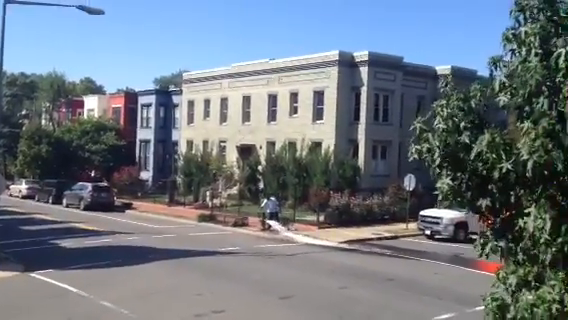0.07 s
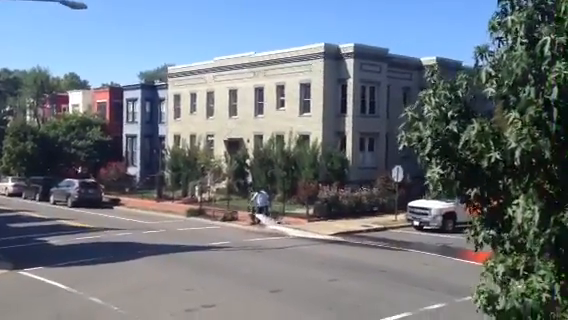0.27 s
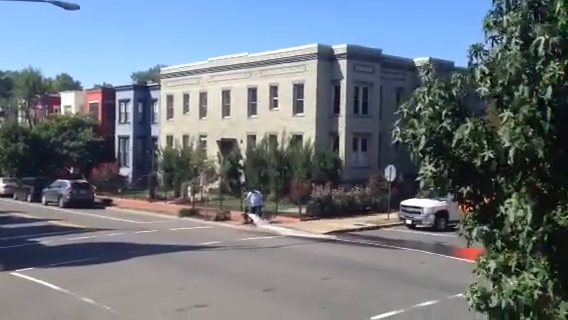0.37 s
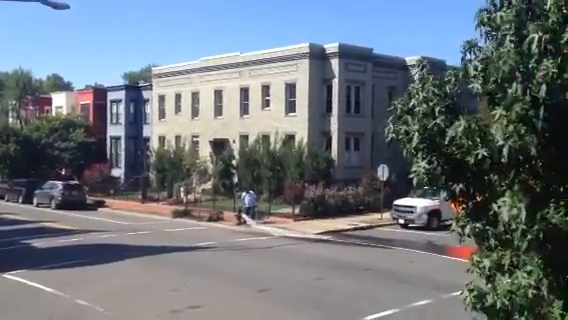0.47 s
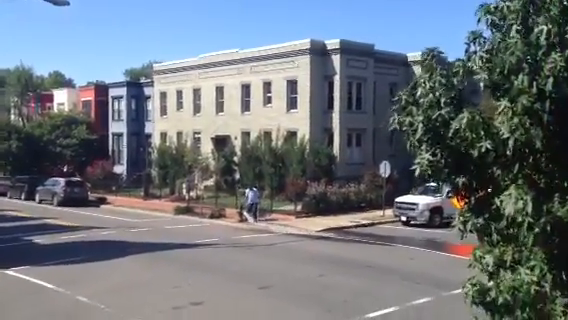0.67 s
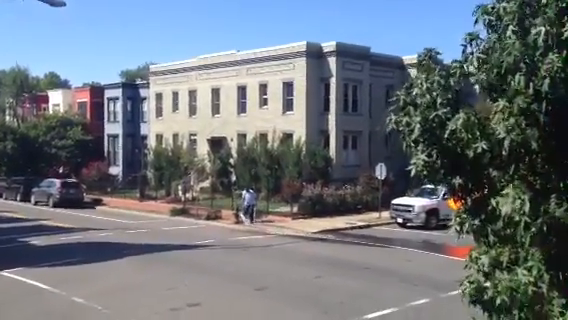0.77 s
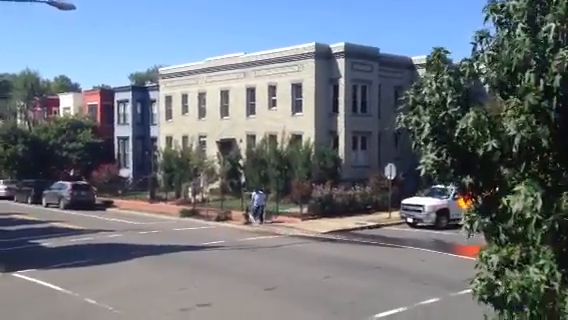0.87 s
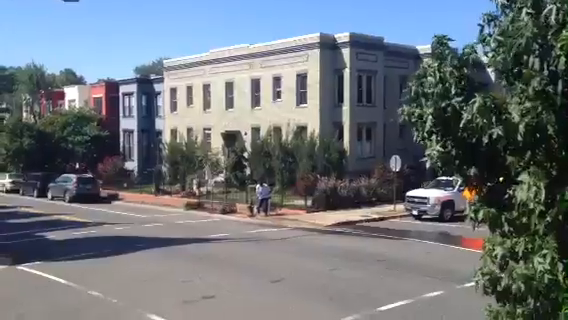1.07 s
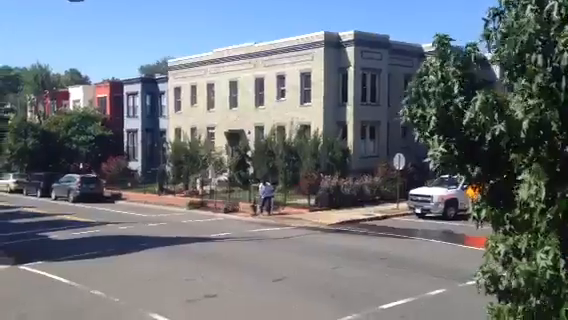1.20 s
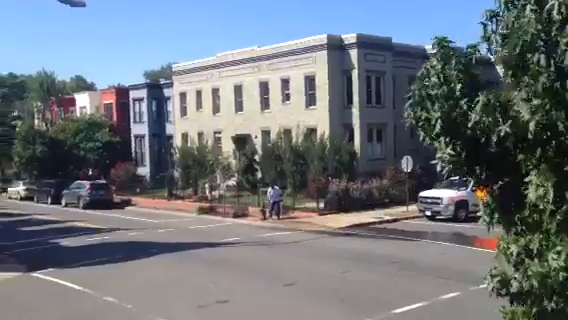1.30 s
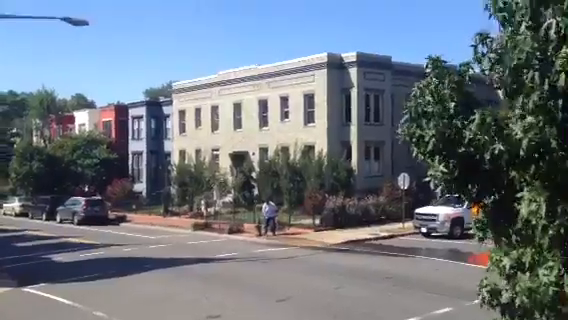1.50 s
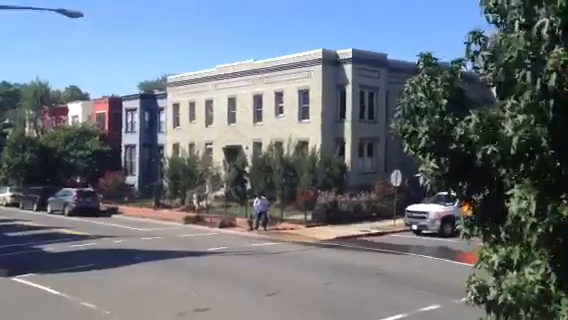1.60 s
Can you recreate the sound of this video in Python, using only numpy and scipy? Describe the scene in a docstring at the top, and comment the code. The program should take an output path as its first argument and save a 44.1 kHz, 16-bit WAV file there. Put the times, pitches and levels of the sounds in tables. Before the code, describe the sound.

Wind buffets the microphone in two gusts over a distant hose's fading hiss.

```python
"""Distant hose in gusty wind

Water gushes from a hose far across a city street: an even hiss that drops back and fades over a
faint traffic wash. Wind buffets the microphone in two gusts: a low flutter, with single eddies
that thump as they cross the port. One brief bright spit of hiss sounds at the microphone."""
import sys
import numpy as np
from scipy.fft import rfft, irfft, next_fast_len
from scipy.io import wavfile
from scipy.ndimage import uniform_filter1d, map_coordinates

SR = 44100
rng = np.random.default_rng(int(sys.argv[2]) if len(sys.argv) > 2 else 0)


def to_wav(sig):
    """Store sig (one row per channel, or 1-D mono) as 16-bit WAV at the path in sys.argv[1].

    Samples outside -1..1 are clipped; the rate is SR.
    """
    pcm = np.clip(np.atleast_2d(sig), -1, 1) * 32767
    pcm = np.round(pcm).astype(np.int16)
    wavfile.write(sys.argv[1], SR, pcm.T)  # frames by channels


N = 72765


def amp(db):
    """Decibels to gain."""
    return 10 ** (np.asarray(db) / 20)


def curve(rows):
    """(time [s], value) points to one value per sample."""
    return np.interp(np.arange(N) / SR, *np.transpose(rows))


def wobble(rate_hz):
    """Smooth random curve, rate_hz knots a second."""
    return map_coordinates(rng.standard_normal(8192), [np.arange(N) * rate_hz / SR], mode="wrap")


def filtered(x, response):
    """Apply a gain given as a function of frequency [Hz]."""
    size = next_fast_len(N + SR // 2)
    return irfft(rfft(x, size) * response(np.fft.rfftfreq(size, 1 / SR)), size)[:N]


def noise(spectrum):
    """Unit-rms noise coloured by (frequency [Hz], density [dB]) points."""
    knots_hz, db = np.transpose(spectrum)
    x = filtered(rng.standard_normal(N), lambda hz: amp(np.interp(np.log(hz + 1), np.log(knots_hz), db)))
    return x / np.sqrt(np.mean(x ** 2) + 1e-20)


def steadied(x, span_s):
    """Even out swells slower than span_s."""
    power = uniform_filter1d(x * x, max(int(span_s * SR), 2))
    return x / np.sqrt(np.abs(power) + 1e-6)


def street():
    """Steady wash of far traffic."""
    # traffic spectrum (frequency [Hz], density [dB])
    spectrum = [(25, -42), (120, 13), (300, -21), (650, -14.5), (1000, -10.5), (1600, -22), (3000, -12),
                (8000, -33.5)]
    return amp(-57.5) * noise(spectrum)


def water():
    """Far spray, heard as a slightly restless hiss."""
    # hiss envelope (time [s], level [dB])
    envelope = [(0, -46), (.29, -47.5), (.312, -43.5), (.352, -47.5), (.368, -53), (.7, -53.5),
                (1.008, -56.5), (1.02, -51), (1.07, -51.5), (1.15, -55.5), (1.65, -56)]
    # spray spectrum (frequency [Hz], density [dB])
    spectrum = [(300, -17), (1000, 8.5), (1700, 6), (2900, -0.5), (4700, 0.5), (5500, -3), (6600, -0.5),
                (8300, -2), (9900, -8), (11500, -7), (14200, -11), (15300, -19)]
    waver_db = 0.55
    return noise(spectrum) * amp(curve(envelope) + waver_db * wobble(rate_hz=25))


def microphone_hiss():
    """One brief bright spit of hiss at the microphone."""
    # hiss spectrum (frequency [Hz], density [dB])
    spectrum = [(2000, -13), (5000, -7), (8000, -3), (13000, 3), (15300, -4)]
    level_db, centre_s, half_s = -58, 1.026, 0.011
    return amp(level_db) * np.exp(-((np.arange(N) / SR - centre_s) / half_s) ** 2) * noise(spectrum)


def buffeting():
    """Turbulence at the port: stronger wind is louder and brighter, and comes in lumps."""
    # wind at the microphone (time [s], strength [dB])
    strength = [(0, -34), (.035, -34.5), (.06, -34), (.15, -31.5), (.19, -36.5), (.235, -27.5), (.278, -14),
                (.3, -21.5), (.355, -22.5), (.372, -28), (.398, -39.5), (.44, -34), (.53, -36), (.6, -39.5),
                (.69, -34.5), (.73, -30), (.79, -27.5), (.85, -27), (.895, -15), (.925, -25.5), (.968, -16),
                (1.0, -22.5), (1.08, -28), (1.11, -32), (1.2, -30), (1.24, -30.5), (1.36, -29.5),
                (1.45, -30), (1.485, -35), (1.53, -34), (1.61, -37.5), (1.65, -35.5)]
    # rumble spectrum (frequency [Hz], density [dB])
    rumble_spectrum = [(25, 1.5), (70, -8), (130, -1.5), (200, -0.5), (300, -26), (450, -39.5),
                       (700, -36.5), (1500, -69)]
    # flutter spectrum (frequency [Hz], density [dB])
    flutter_spectrum = [(100, -14), (230, 2), (400, -2.5), (550, -8), (800, -15.5), (1300, -35),
                        (2500, -45), (5000, -93)]
    calm_db, rumble_db, flutter_db = -29, -32, -36.5  # reference strength; layer levels at it
    lump_db, flicker_db, flutter_growth = 2.4, 2.3, 1.48
    gust_db = curve(strength) - calm_db
    swell_db = lump_db * wobble(rate_hz=80)
    rumble = steadied(noise(rumble_spectrum), span_s=0.021) * amp(rumble_db + gust_db + swell_db)
    flutter = steadied(noise(flutter_spectrum), span_s=0.0215)
    flutter *= amp(flutter_db + flutter_growth * gust_db + swell_db + flicker_db * wobble(rate_hz=130))
    return rumble + flutter


def eddies():
    """Each vortex swings the pressure once or twice inside a ragged wake; fast ones shed more."""
    # eddies crossing the port (time [s], strength [dB], pitch [Hz])
    crossings = [(.046, -30.5, 259), (0.0626, -20, 187), (0.0846, -19.5, 189), (0.1113, -26, 235),
                 (.1455, -23, 386), (0.15, -13.5, 200), (0.1644, -20.5, 177), (.208, -26, 192),
                 (.2314, -12, 201), (0.2489, -13, 218), (.2549, -14.5, 995), (0.2695, -3.5, 350),
                 (0.2755, -2.5, 510), (0.2788, -2.5, 223), (0.2982, -9, 460), (0.3084, -8, 340),
                 (0.3145, -13.5, 237), (0.3343, -7.5, 444), (0.3377, -8, 460), (0.3495, -14, 290),
                 (0.3576, 0.5, 320), (0.429, -24, 213), (0.445, -22.5, 283), (0.4567, -50, 238),
                 (0.4956, -25.5, 228), (0.5779, -26, 278), (0.67, -21.5, 212), (.711, -20.5, 305),
                 (0.7238, -17.5, 256), (0.7492, -32.5, 294), (0.7609, -16, 182), (.8013, -18, 356),
                 (0.8104, -11.5, 317), (0.8223, -12, 223), (0.8321, -7.5, 260), (0.8608, -18.5, 255),
                 (0.8736, -24, 328), (0.887, -1, 405), (.8955, -22, 900), (0.8968, -8.5, 312),
                 (0.9073, -6, 384), (0.9095, -24, 1100), (.918, -12, 214), (0.9384, -9.5, 336),
                 (.9516, -6, 220), (0.9649, -2, 216), (0.966, -13.5, 720), (.9697, -5, 734),
                 (0.9836, -15.5, 272), (0.9925, -17, 295), (1.0039, -35, 330), (1.0314, -10.5, 315),
                 (1.068, -18.5, 864), (1.0732, -8.5, 333), (1.0848, -15, 266), (1.135, -23.5, 356),
                 (1.1775, -22, 333), (1.2243, -18.5, 350), (1.2391, -22, 305), (1.275, -15.5, 342),
                 (1.2942, -21, 302), (1.3091, -14, 185), (1.3247, -21, 174), (1.3501, -16, 260),
                 (1.3645, -29, 376), (1.395, -14.5, 252), (1.433, -20.5, 216), (1.4548, -17.5, 320),
                 (1.5095, -25.5, 232), (1.5479, -28, 282), (1.625, -24, 313), (1.6402, -24, 203)]
    # wake spectrum (frequency [Hz], density [dB])
    wake_spectrum = [(200, -27), (450, -1), (900, 10), (1400, -3.5), (2200, -19), (3200, -31), (6000, -63)]
    order = 6.6  # higher: rounder, more swings
    wake_db, wake_ref_hz, wake_db_per_octave, wake_half_s = -20.5, 422, 14.5, 0.00255
    t, swings, wake_gain = np.arange(N) / SR, np.zeros(N), np.zeros(N)
    phases = rng.uniform(0, 2 * np.pi, len(crossings))
    for (centre_s, db, hz), phase in zip(crossings, phases):
        near = np.abs(t - centre_s) < 0.04
        offset_s = t[near] - centre_s
        position = 2 * np.pi * hz * offset_s / (order - 0.5)
        swings[near] += amp(db) * np.real(np.exp(1j * phase) / (1 - 1j * position) ** order)
        shed_db = db + wake_db + wake_db_per_octave * np.log2(hz / wake_ref_hz)
        wake_gain[near] += amp(shed_db) * np.exp(-(offset_s / wake_half_s) ** 2)
    return swings + wake_gain * steadied(noise(wake_spectrum), span_s=0.006)


def port(pressure):
    """Microphone port: the flow saturates, then deep bass and fast pressure changes are shed."""
    overload, low_hz, high_hz = 0.73, 111, 3380
    flow = overload * np.tanh(pressure / overload)
    return filtered(flow, lambda hz: ((1 + (low_hz / (hz + 1)) ** 6) * (1 + (hz / high_hz) ** 10)) ** -0.5)


def wind():
    """Turbulence and eddies through the port; the hardest pushes are rounded and stay dull."""
    return port(buffeting() + eddies())


def scene():
    """Water and street far off, wind right at the microphone; mono."""
    return (water() + microphone_hiss() + street() + wind())[None]


def record(dry):
    """The recorder keeps nothing above its band limit."""
    top_hz = 15400
    return np.array([filtered(x, lambda hz: hz < top_hz) for x in dry])


dry = scene()
out = record(dry)
to_wav(out)
```